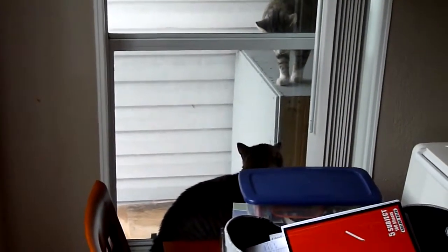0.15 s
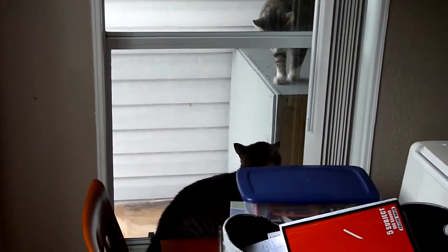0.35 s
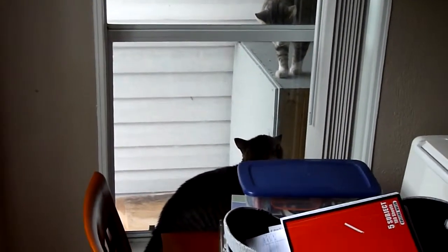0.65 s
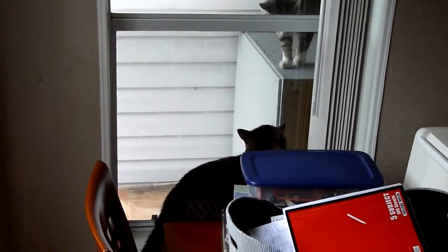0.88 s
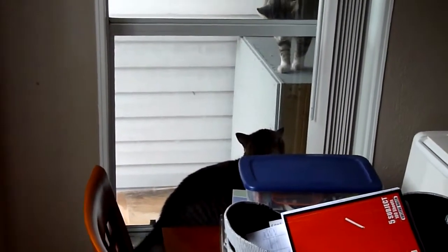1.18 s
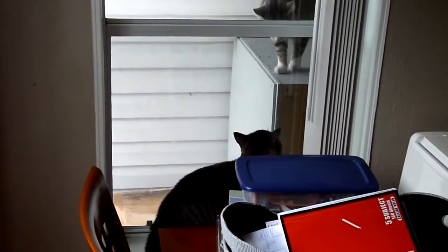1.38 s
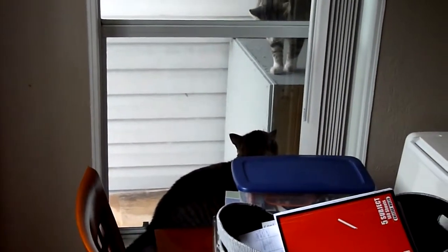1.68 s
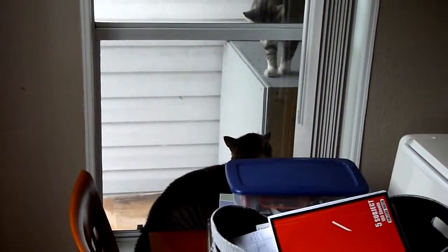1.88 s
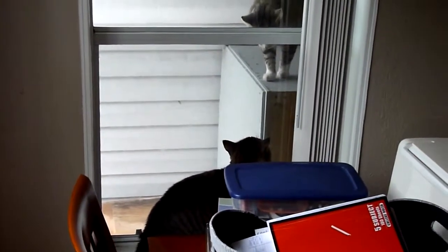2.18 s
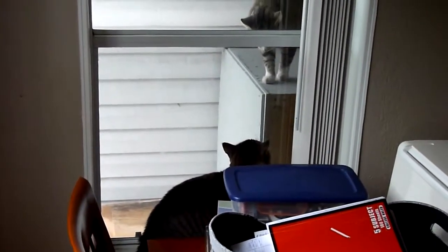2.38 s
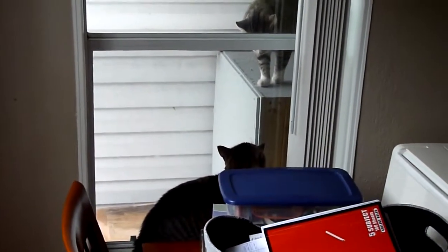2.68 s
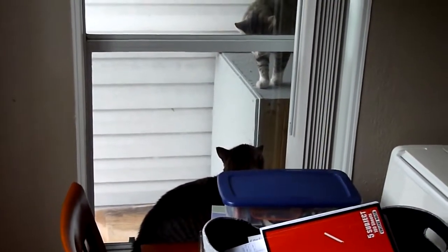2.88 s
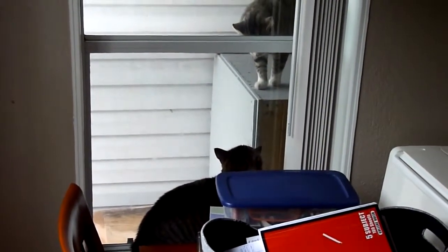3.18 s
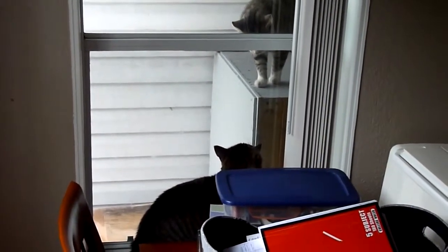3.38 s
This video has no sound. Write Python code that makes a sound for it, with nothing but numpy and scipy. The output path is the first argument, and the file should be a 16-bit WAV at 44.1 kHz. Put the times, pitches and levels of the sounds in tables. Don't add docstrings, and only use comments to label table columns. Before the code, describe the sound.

After a brief moment of appliance hum, a cat holds one long wavering yowl with small gulps, then stops with a breathy rasp and short room ring; two soft knocks, hissy handheld microphone indoors.

```python
import sys
import numpy as np
from scipy import signal
from scipy.fft import rfft, irfft
from scipy.io import wavfile
from scipy.ndimage import uniform_filter1d

SR = 44100
rng = np.random.default_rng(int(sys.argv[2]) if len(sys.argv) > 2 else 0)


def unload_audio(sound):
    columns = np.transpose(np.atleast_2d(sound))
    steps = np.round(np.clip(columns, -1, 1) * 32767)
    wavfile.write(sys.argv[1], SR, steps.astype(np.int16))


def decibels_to_gain(level_db):
    exponent = np.asarray(level_db, float) / 20
    return 10 ** exponent


N = 154350


def evened(x):
    return x / np.sqrt(np.mean(x ** 2) + 1e-20)


def read(points, hz):
    f, value = np.transpose(points)
    return np.interp(np.log(hz + 1), np.log(f + 1), value)


def drift(rate_hz):
    f = np.fft.rfftfreq(N, 1 / SR)
    return evened(irfft(rfft(rng.standard_normal(N)) * np.exp(-(f / rate_hz) ** 2), N))


def resonate(x, hz, width_hz):
    r = np.exp(-np.pi * width_hz / SR)
    return 2 * signal.lfilter([1 - r], [1, -r * np.exp(2j * np.pi * hz / SR)], x).real


def smoothed(x, time_s):
    keep = np.exp(-1 / (time_s * SR))
    return signal.lfilter([1 - keep], [1, -keep], x)


# (frequency [Hz], density [dB per Hz])
RUMBLE_SPECTRUM = [(25, -33), (110, -6.5), (297, -9), (600, -18), (1530, -30.5), (2560, -42), (4000, -51.5),
                   (15500, -47)]
# (frequency [Hz], level [dB])
UNSHARED = [(30, -9), (150, -24.5), (500, -21.5), (1500, -5), (4000, 2.5), (9000, 5)]
# (frequency [Hz], width [Hz], level [dB])
MOTOR_TONES = [(103, 9.9, -67.5), (121.4, 17, -53), (175.6, 13, -48), (247, 4.6, -43), (291.6, 3.3, -43)]


def rumble():
    level_db, patch_db, flicker_db = -30.5 - 3.5, 1.5, 2.2
    frames, hz = N // 256 + 5, np.fft.rfftfreq(1024, 1 / SR)
    a, b, c, d, patches = rng.standard_normal((frames, 513, 5)).T
    patches = uniform_filter1d(patches, size=8, axis=0)
    patches = evened(uniform_filter1d(patches, size=10, axis=1))
    flicker = evened(uniform_filter1d(rng.standard_normal(frames), size=4)) * (hz > 3000)[:, None]

    unshared = decibels_to_gain(np.minimum(read(UNSHARED, hz), 0))[:, None]
    left = a + 1j * b
    right = np.sqrt(1 - unshared ** 2) * left + unshared * (c + 1j * d)
    spectrum_db = read(RUMBLE_SPECTRUM, hz)[:, None]
    z = np.array([left, right]) * decibels_to_gain(spectrum_db + patch_db * patches + flicker_db * flicker)
    noise = signal.istft(z, nperseg=1024, noverlap=768)[1][:, :N]

    source = rng.standard_normal(N)
    hum = sum(decibels_to_gain(db) * evened(resonate(source, f, width_hz)) for f, width_hz, db in MOTOR_TONES)
    return decibels_to_gain(level_db) * evened(noise) + hum


# (time [s], level [dB], colour [Hz])
TICKS = [
    (0.082, -54, 9100),
    (1.016, -35.5, 612),
    (1.33, -43.5, 610),
]


def ticks():
    t60_s = 0.14
    out, t = np.zeros(N), np.arange(1300) / SR
    for start_s, db, hz in TICKS:
        puff = resonate(rng.standard_normal(len(t)), hz, 1.5 * hz)
        puff = resonate(puff, hz, 2.5 * hz)
        out[round(start_s * SR):][:len(t)] += decibels_to_gain(db - 60 * t / t60_s) * evened(puff)
    return out


# (time [s], pitch [Hz])
PITCH = [(.2, 421), (.232, 465.4), (.29, 505.6), (.37, 500.2), (.5, 530.9), (.66, 559.8), (.82, 577.9),
         (.96, 581.7), (1.31, 591.1), (1.56, 580.8), (2.08, 568.8), (2.3, 545.4), (2.58, 552),
         (2.67, 534.7), (2.9, 537.5), (2.93, 520.8), (3.1, 519.7), (3.16, 544.9)]
# (time [s], depth [Hz], width [s], added roughness [dB])
GULPS = [
    (0.722, 15, 0.018, 17),
    (1.172, 21, 0.04, -12.5),
    (1.429, 21, .035, 3),
    (1.834, 21, 0.027, 5),
    (2.13, 3.9, 0.047, 12.5),
    (2.782, 9.1, 0.038, 4.5),
    (3.219, 3, 0.046, 35.5),
]
# (time [s], effort [dB], mouth opening [0-1], brightness [dB], half-pitch share [dB], breathiness [dB])
VOICE = [(0.202, -38, 0, 0.5, -47, -43), (.235, -24.5, 0.31, 2, -34, -39), (.3, -22, 0.7, 7.5, -20, -34.5),
         (.42, -22.5, 0.58, 5, -14.5, -40.5), (0.549, -22, .3, -1.5, -55.5, -33),
         (0.662, -25.5, 0.31, 5, -45, -37), (0.781, -17.5, 0.62, 0.5, -59.5, -46.5),
         (1.0, -19, 0.47, 6.5, -32, -37.5), (1.298, -28, 0, 7, -38.5, -31),
         (1.449, -22.5, 0.38, 9, -39.5, -40), (1.648, -18, 0.53, 1, -34.5, -42.5),
         (1.9, -27, 0.13, 6.5, -43.5, -39), (2.12, -26.5, 0.22, 5, -54.5, -44),
         (2.27, -23, 0.25, 10, -67.5, -42.5), (2.7, -26, 0.13, 5.5, -56, -38.5),
         (3.0, -27, 0, 4, -56.5, -45.5), (3.198, -29, 0, 3.5, -50.5, -30.5),
         (3.241, -61, 0.25, 18, -26, -16)]
# (frequency [Hz], level [dB])
THROAT = [(500, -17), (1100, -8), (2350, -9), (2750, -38), (4000, -44), (5000, -50), (7200, -52),
          (15000, -60)]
# (frequency at rest pitch [Hz], width [Hz], level [dB], shift [Hz per Hz of pitch])
CAVITIES = [(2930, 410, -3, 7), (3480, 480, 6, 5), (4364, 140, 15, -2.5), (5968, 320, 16, 7.5),
            (7566, 130, 10, 15), (9990, 340, 8, 10.5), (14300, 800, 2, -4.2)]


def yowl():
    wobble, wobble_hz, rest_hz = .0034, 42, 550
    mouth_shut_hz, mouth_open_hz, mouth_width_hz, mouth_db = 1008, 1886, 233, 15.5
    gulp_shut_per_hz, gulp_lift_db_per_hz, open_thin_db = 0.016, 0.11, -14.5
    ring_share, high_fuzz_db = 0.048, 12
    t, rows = np.arange(N) / SR, np.array(VOICE)
    effort_db, opening, bright_db, half_db, breath_db = (np.interp(t, rows[:, 0], c) for c in rows.T[1:])
    hz = uniform_filter1d(np.interp(t, *np.transpose(PITCH)), size=400) * (1 + wobble * drift(wobble_hz))

    sag_hz = sum(depth_hz * np.exp(-((t - s) / w) ** 2) for s, depth_hz, w, _ in GULPS)
    rough_db = sum(db * np.exp(-((t - s) / w) ** 2) for s, _, w, db in GULPS)
    hz = hz - sag_hz
    opening = opening - gulp_shut_per_hz * sag_hz
    effort_db = effort_db + gulp_lift_db_per_hz * sag_hz
    half_db = half_db + rough_db

    turns = np.cumsum(hz) / SR
    mouth_hz = mouth_shut_hz + (mouth_open_hz - mouth_shut_hz) * opening
    rise_hz = np.maximum(hz - rest_hz, -20)
    ring = 1 + ring_share * bright_db
    out = np.zeros(N)
    for half in range(2, 54):
        between = half % 2
        if between and half > 16:
            continue
        f, high = hz * half / 2, half > 9
        db = read(THROAT, f) + mouth_db / (1 + ((f - mouth_hz) / mouth_width_hz) ** 2)
        db += between * (half_db - high * .6 * rough_db)
        for cavity_hz, width_hz, cavity_db, shift in CAVITIES:
            db += cavity_db * ring / (1 + ((f - cavity_hz - shift * rise_hz) / width_hz) ** 2)
        if half < 5:
            db += open_thin_db * (opening + (half < 4) * gulp_shut_per_hz * sag_hz)
        if high:
            db += 0.55 * bright_db + 3 * drift(9)
            fuzz_db = breath_db + high_fuzz_db + 0.29 * rough_db
        else:
            db += 1.7 * drift(25)
            fuzz_db = breath_db + 0.32 * rough_db
        fuzz = decibels_to_gain(fuzz_db) * drift(340)
        out += decibels_to_gain(db) * (1 + fuzz * 3) * np.cos(np.pi * half * turns + 2 * np.pi * rng.random())
    sounding = (t > rows[0, 0]) * (t < rows[-1, 0])
    return uniform_filter1d(decibels_to_gain(effort_db) * sounding, size=300) * out


def breath():
    hiss_db, hiss_low_hz, flutter_db, linger_s = -38.5, 4460, 4, 0.032
    t, rows = np.arange(N) / SR, np.array(VOICE)
    push_db = np.interp(t, rows[:, 0], rows[:, 1] - 21, -199, -199)
    leak_db = np.interp(t, rows[:, 0], rows[:, 5]) + 39.5
    effort = decibels_to_gain(.5 * push_db + .3 * leak_db)
    a, b, shared = rng.standard_normal((3, N))
    high_pass = signal.butter(2, hiss_low_hz, "high", fs=SR, output="sos")
    air = signal.sosfilt(high_pass, [a + 0.26 * shared, b + 0.26 * shared])
    air = .5 * air + sum(decibels_to_gain(db - 6.5) * resonate(air, f, 2 * width_hz) for f, width_hz, db, _ in CAVITIES)
    return decibels_to_gain(hiss_db + flutter_db * drift(30)) * smoothed(effort, linger_s) * air


# (frequency [Hz], width [Hz], level against direct [dB], left-right [dB])
WAVES = [(557.9, 8.3, 2, -9), (602, 60, 6, -4.5), (1082.8, 7.2, 0, 6), (1086, 4, 6, 1), (1128, 20, 4.5, 4),
         (1170.8, 12, 3.5, 4.5), (1492.6, 10, 9, 3), (1652, 40, -3.5, -4.5), (1701.3, 10.65, 1.5, 9),
         (2067.4, 8.3, 12.5, -0.5), (2145.7, 7.3, 13.5, -3.5), (2302.3, 10, -10.5, 9.5),
         (2341, 9.8, -5.5, 16)]
# (frequency [Hz], left-right [dB])
LEAN = [(500, -1.7), (1000, -2.65), (2000, 4.5), (5000, 3), (12000, 2.7)]
# (frequency [Hz], lead [rad])
TURN = [(700, .01), (1100, .15), (1700, .35), (2300, .7), (5000, .6), (12000, 1.2)]


def room(x):
    narrowest_hz, tail_db, tail_t60_s, tail_low_hz, side_low_hz = 15, -8, .5, 1320, 950
    f = np.fft.rfftfreq(N, 1 / SR)
    side = np.array([[.5], [-.5]])
    waves = sum(decibels_to_gain(db + side * pan_db) * resonate(x, hz, max(width_hz, narrowest_hz))
                for hz, width_hz, db, pan_db in WAVES)
    ports = decibels_to_gain(side * read(LEAN, f)) * np.exp(1j * side * read(TURN, f))
    near = irfft(rfft(x + waves) * ports, N)

    t = np.arange(SR // 2) / SR
    shared, *own = rng.standard_normal((3, len(t))) * decibels_to_gain(-60 * t / tail_t60_s) * (t > .004)
    high_pass = signal.butter(4, tail_low_hz, "high", fs=SR, output="sos")
    taps = 0.85 * shared + signal.sosfilt(high_pass, own)
    taps = taps / np.linalg.norm(taps[0])
    both = near + decibels_to_gain(tail_db) * signal.fftconvolve(x[None], taps, axes=1)[:, :N]
    low_side = irfft(rfft(both[0] - both[1]) / (1 + (f / side_low_hz) ** 6), N)
    return both - side * low_side


def ducking(x):
    knee_db, squeeze, fall_s, recover_db_per_s = -39, 0.54, 0.11, 59
    power_db = 10 * np.log10(abs(uniform_filter1d(x ** 2, size=2000, origin=999)) + 1e-9)
    fall_db = np.arange(N) * recover_db_per_s / SR
    held_db = np.maximum.accumulate(power_db + fall_db) - fall_db
    over_db = np.maximum(held_db - knee_db, 0)
    return decibels_to_gain(-squeeze * smoothed(over_db, fall_s))


def scene():
    cat = yowl()
    return room(cat + ticks()) + breath() + rumble() * ducking(cat)


def top_cut(x):
    return signal.sosfilt(signal.butter(12, 15990, fs=SR, output="sos"), x)


# (frequency [Hz], width [Hz], depth [dB])
GAPS = [(2650, 170, -22), (4640, 200, -16), (7900, 260, -14)]


def record(dry):
    limit_db, limit_squeeze, edge_hz = -10.5, 0.77, 15400
    f = np.fft.rfftfreq(N, 1 / SR)
    loud_db = 10 * np.log10(abs(uniform_filter1d((dry ** 2).mean(0), size=500)) + 1e-9)
    over_db = uniform_filter1d(np.maximum(loud_db - limit_db, 0), size=300)
    held = dry * decibels_to_gain(-limit_squeeze * over_db)
    db = sum(depth_db * np.exp(-((f - hz) / width_hz * 2) ** 4) for hz, width_hz, depth_db in GAPS)
    db = db - 60 * np.clip((f - edge_hz) / 500, 0, 1)
    return top_cut(irfft(rfft(held) * decibels_to_gain(db), N))


dry = scene()
out = record(dry)
unload_audio(out)
```